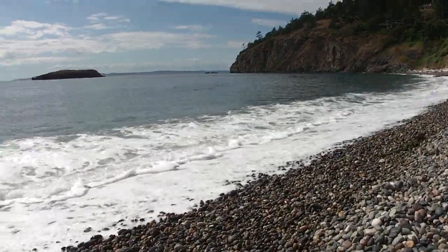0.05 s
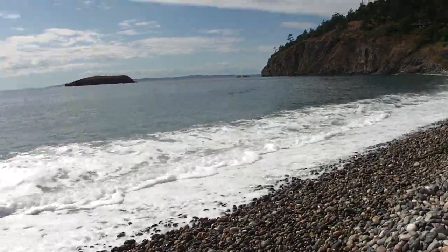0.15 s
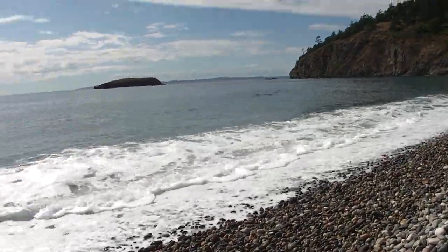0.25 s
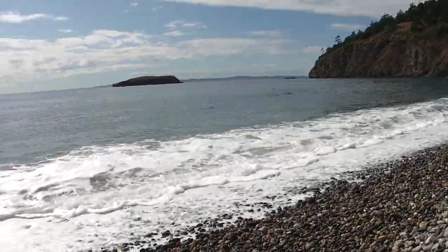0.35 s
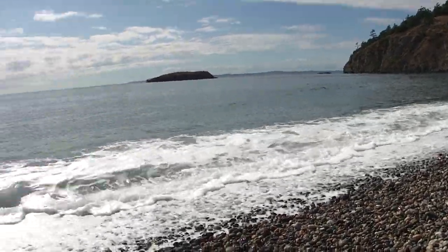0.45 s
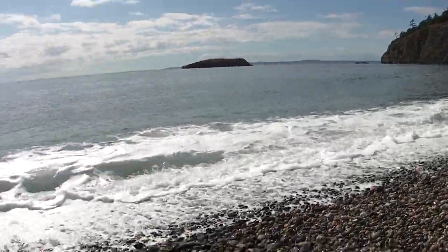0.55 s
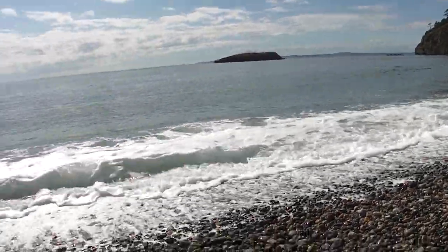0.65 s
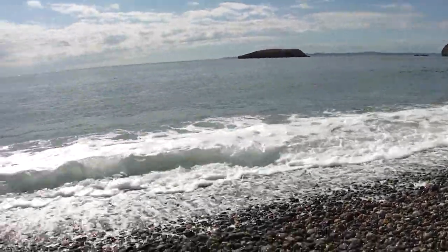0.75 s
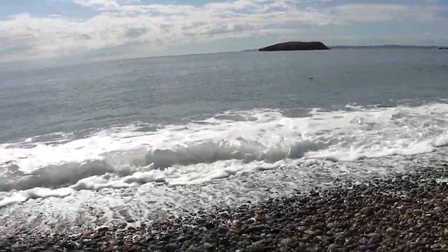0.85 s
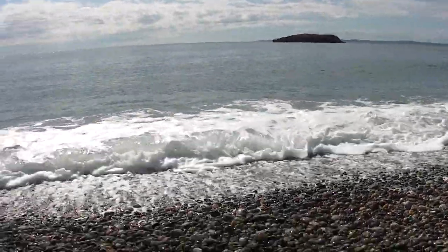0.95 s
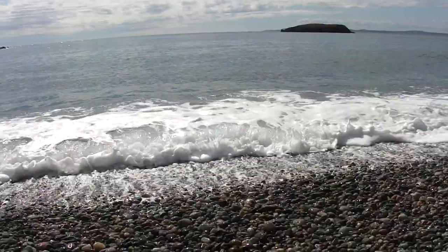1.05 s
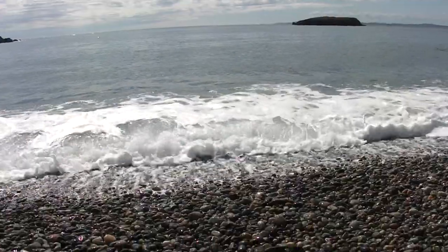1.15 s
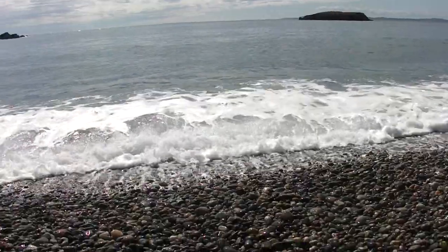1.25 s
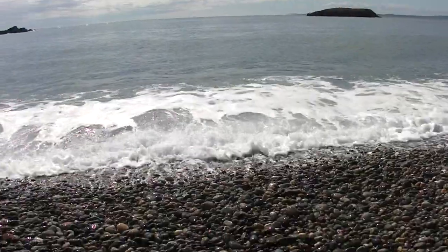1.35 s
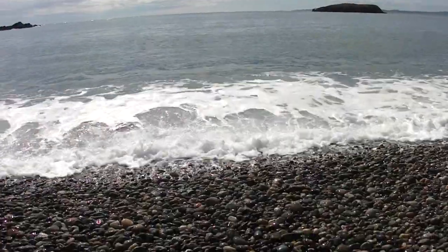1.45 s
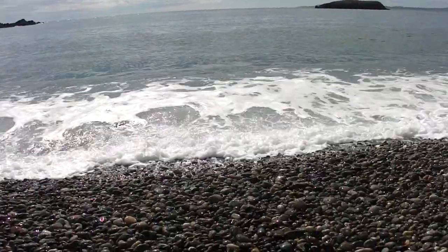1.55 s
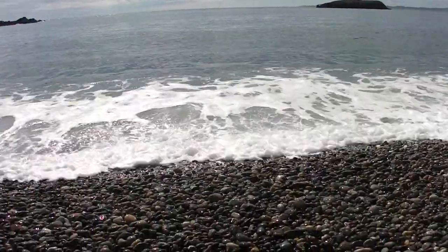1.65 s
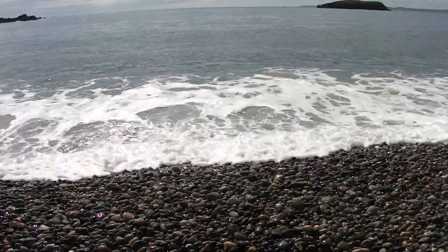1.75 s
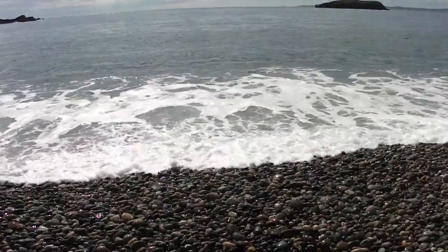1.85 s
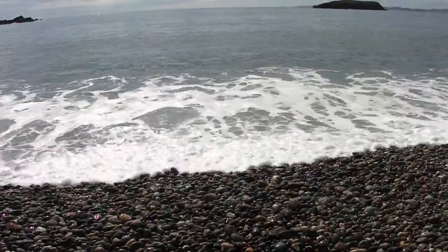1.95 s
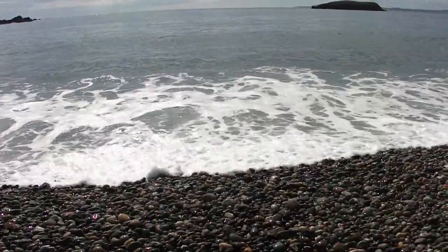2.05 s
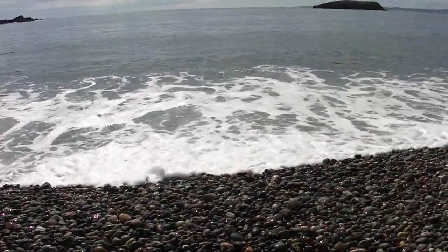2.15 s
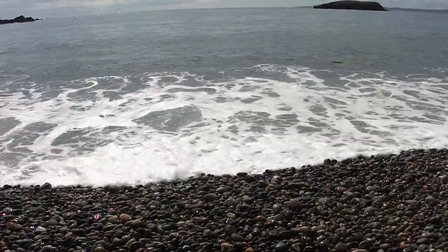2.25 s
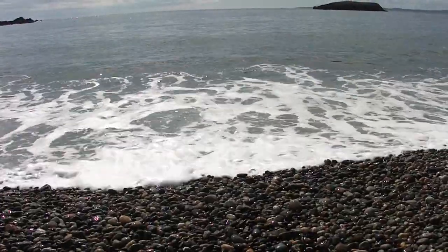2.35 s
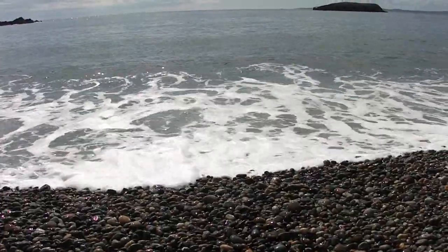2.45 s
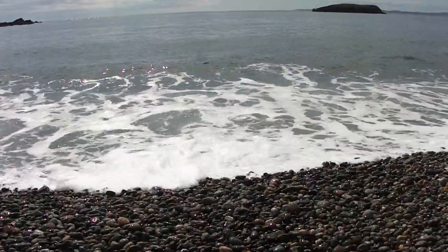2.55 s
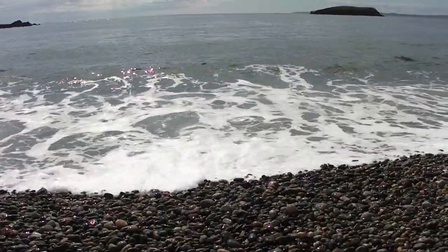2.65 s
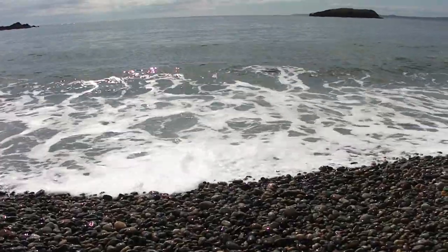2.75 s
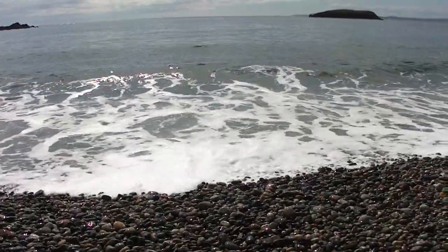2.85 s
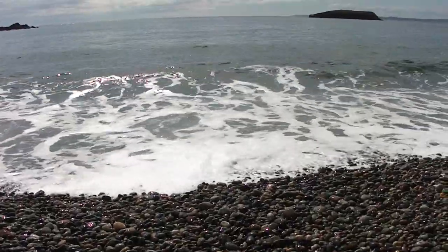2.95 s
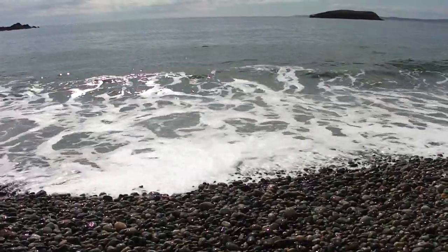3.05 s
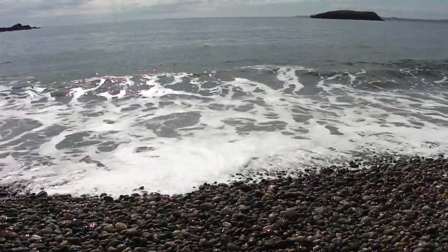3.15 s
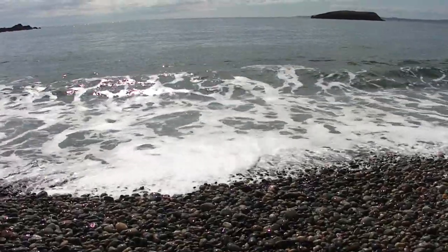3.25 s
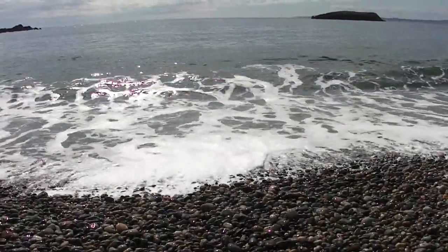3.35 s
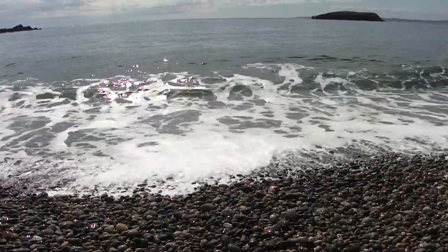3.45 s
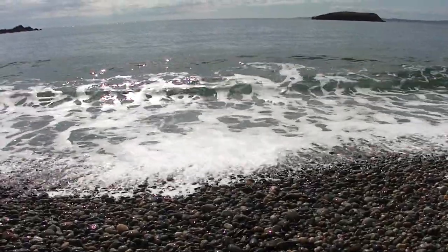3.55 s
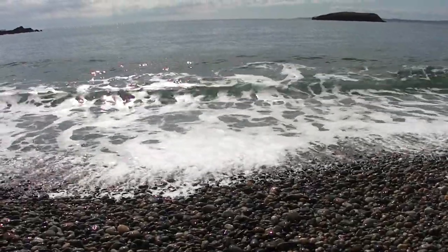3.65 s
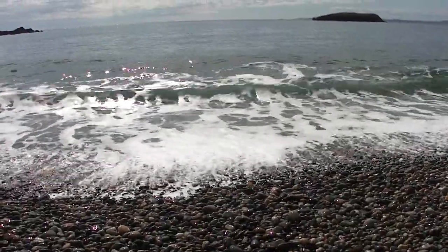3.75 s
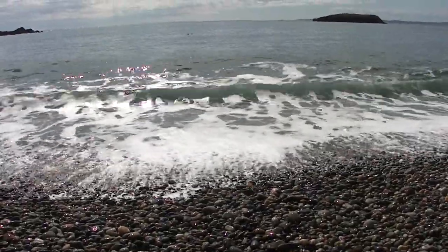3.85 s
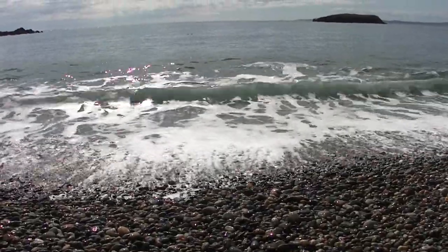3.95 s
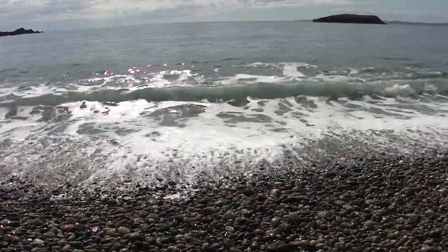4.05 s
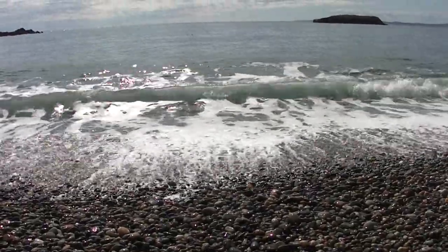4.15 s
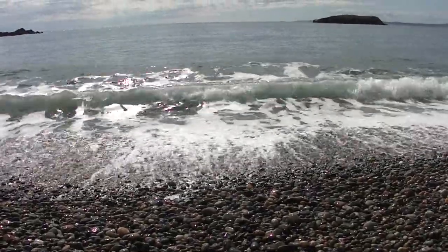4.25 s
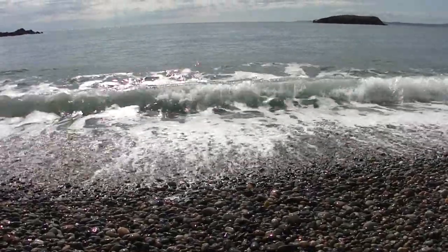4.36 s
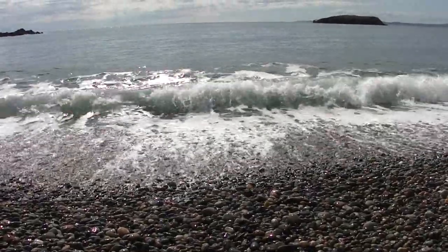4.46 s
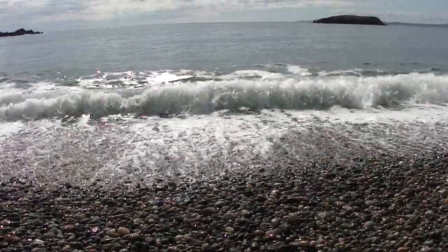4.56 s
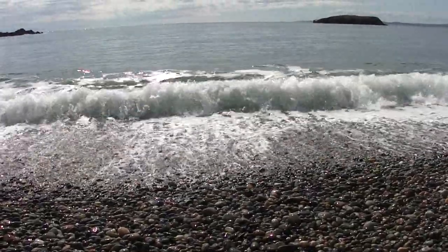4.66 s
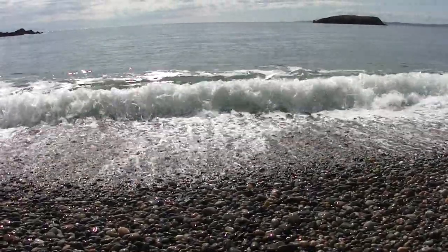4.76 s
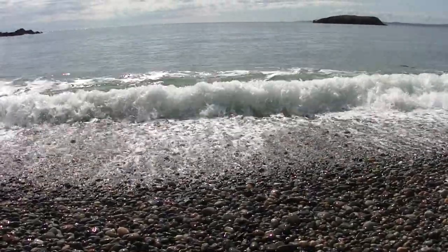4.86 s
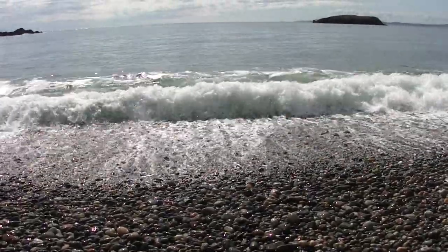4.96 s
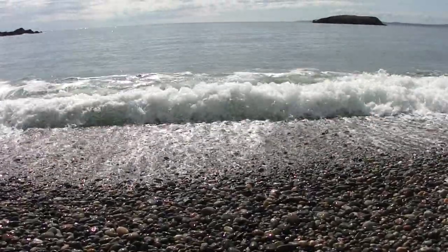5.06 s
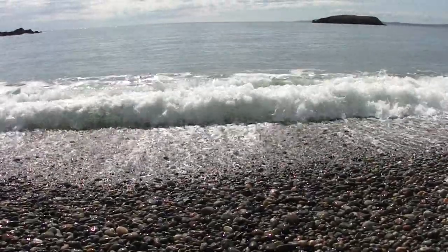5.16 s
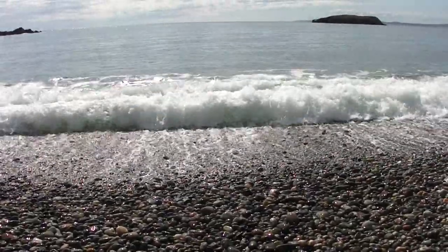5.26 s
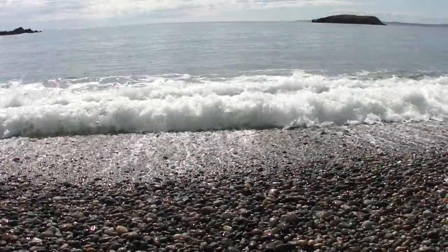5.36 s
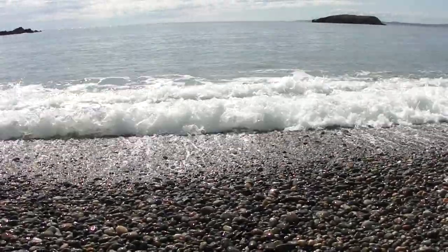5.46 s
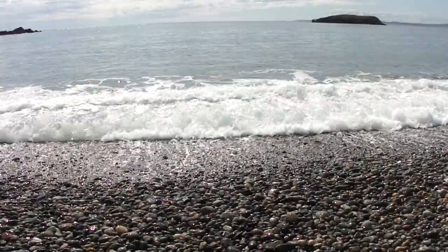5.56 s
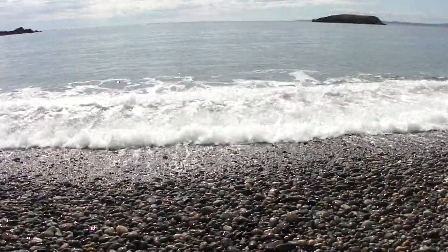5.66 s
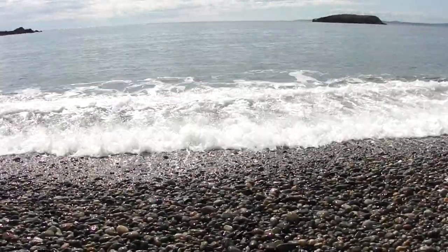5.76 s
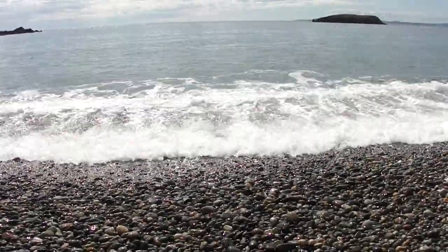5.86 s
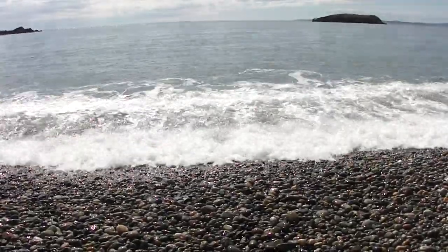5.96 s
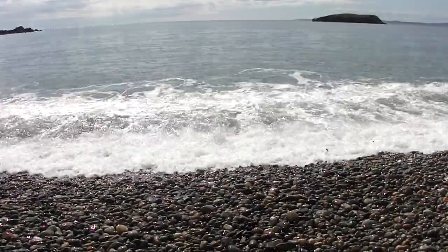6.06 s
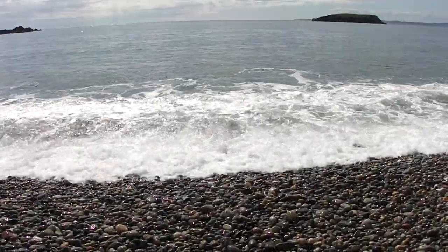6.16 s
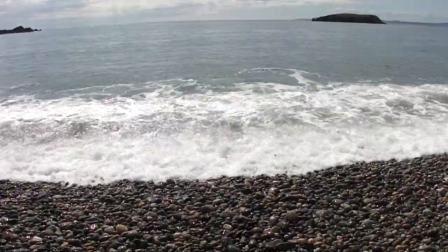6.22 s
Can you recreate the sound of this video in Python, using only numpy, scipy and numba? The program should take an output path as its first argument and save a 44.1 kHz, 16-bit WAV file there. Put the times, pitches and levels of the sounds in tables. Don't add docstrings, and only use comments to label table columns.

```python
import sys
import numpy as np
from scipy import signal
from scipy.io import wavfile
from scipy.ndimage import uniform_filter1d, map_coordinates
from numba import njit

SR = 44100
rng = np.random.default_rng(int(sys.argv[2]) if len(sys.argv) > 2 else 0)


def volts_from_decibels(level):
    exponent = np.asarray(level, float) / 20
    return 10 ** exponent


def master(y):
    cut = np.clip(np.atleast_2d(y).T, -1, 1)
    pcm = np.round(cut * 32767)
    wavfile.write(sys.argv[1], SR, pcm.astype(np.int16))


N = 277389
FRAME, HOP = 1024, 256
TIME = np.arange(N // HOP + 2) * HOP / SR
PITCH = np.maximum(np.arange(FRAME // 2 + 1), .5) * SR / FRAME

# middle_s, peak_db, pitch_hz
LEFT_EDDIES = [(0.048, -6, 226), (0.069, -3, 312), (0.137, -0.5, 280), (0.155, -2, 230), (0.187, -3, 340),
               (0.194, -8, 335), (0.234, -1, 420), (0.312, -2.5, 262), (0.396, -2, 448), (0.411, -2, 390),
               (0.44, -2, 380), (0.468, -6.5, 239), (0.54, -1.5, 270), (0.821, -8, 300), (0.948, -6.5, 280),
               (1.24, -4, 251), (3.775, -10, 292), (3.989, -5.5, 220)]
# middle_s, peak_db, pitch_hz
RIGHT_EDDIES = [(0.66, -2, 320), (0.68, -5, 390), (0.691, -5, 390), (0.742, 1.5, 420), (0.983, -5.5, 250),
                (1.076, -4, 300), (1.151, -2, 300), (1.357, -7, 200), (1.947, -9.5, 298), (2.03, -10, 180),
                (2.695, -18, 170), (2.725, -13.5, 155), (3.336, -7.5, 229), (3.414, -10, 410),
                (3.44, -5.5, 312), (3.468, 0, 290), (3.495, -0.5, 250), (3.509, -0.5, 380), (3.53, -1, 392),
                (3.542, -6, 370), (3.56, -4, 258), (3.578, -1.5, 368), (3.595, -4, 320), (3.602, -4, 520),
                (3.684, -9.5, 250), (3.864, -4, 280), (3.885, -3, 290), (3.907, -4.5, 308),
                (3.954, -6, 197), (4.154, -7, 240)]


def wind(rate_hz=185, calm_hz=135, rise_oct_per_db=0.04, scatter_db=4.5, rumble_db=-3, swirl_db=-5):
    # middle_s, hold_s, level_db
    left_gusts = [(0.25, 0.48, -13.5), (0.7, 0.044, -13.5), (0.87, 0.12, -15.5), (1.0, 0.033, -18),
                  (1.27, 0.22, -18.5), (1.75, .1, -42), (2.0, .03, -42), (3.7, .05, -21),
                  (3.8, 0.024, -11.5), (4.05, 0.13, -24), (4.97, .3, -30), (5.3, .2, -39)]
    # middle_s, hold_s, level_db
    right_gusts = [(0.0, 0.033, -21), (0.3, .03, -18), (0.6, 0.21, -14), (1.1, 0.15, -15.5),
                   (1.4, 0.024, -19), (1.8, 0.24, -38), (2.0, 0.053, -21), (2.2, 0.1, -25),
                   (2.4, 0.24, -43), (2.71, 0.043, -31), (3.05, .02, -38.5), (3.51, 0.21, -11.5),
                   (3.8, 0.32, -18.5), (4.1, .03, -11.5), (4.55, 0.38, -23), (4.8, 0.027, -14.5),
                   (5.05, .1, -38), (5.5, .03, -44), (5.8, .03, -40)]
    port_cross = 0.31

    ports = np.zeros((2, N + SR))
    hits = []  # middle_s, peak, pitch_hz, port
    for port, table in enumerate([LEFT_EDDIES, RIGHT_EDDIES]):
        hits += [(s, volts_from_decibels(db), hz, port) for s, db, hz in table]
    for port, gust_db in enumerate([gusts(left_gusts), gusts(right_gusts)]):
        chance = rng.random((1200, 3))[:int(rate_hz * N / SR)]
        for when, size, quick in chance:
            db = gust_db[int(when * N / HOP)]
            peak = volts_from_decibels(db + swirl_db + scatter_db * min(-np.log(size), 3))
            hz = calm_hz * 2 ** (rise_oct_per_db * (db + 41) + 1.37 * (quick - .5))
            hits.append((when * N / SR, peak, hz, port))
        lowpass = signal.butter(2, 90, fs=SR, output="sos")
        rumble = signal.sosfilt(lowpass, rng.standard_normal(N))
        buffet_db = 0.53 * (gust_db + 38.5) - 36.5 + rumble_db + 4.2 * walk(25)[0]
        buffet = np.interp(np.arange(N) / SR, TIME, volts_from_decibels(buffet_db))
        ports[port, :N] += rumble / rumble.std() * buffet

    for (s, peak, hz, port), skew in zip(hits, rng.uniform(0, 2 * np.pi, size=4000)):
        shape = eddy(hz, skew)
        i = int((s - .0012) * SR) - len(shape) // 2
        ports[port, max(i, 0):i + len(shape)] += peak * shape[max(-i, 0):]
    left, right = ports[:, :N]
    return np.array([left - port_cross * right, right - port_cross * left])


def eddy(hz, skew):
    x = np.arange(-2 * SR // hz, 2 * SR // hz) * hz / SR
    return np.cos(2 * np.pi * x - skew) * np.exp(-np.abs(x / .47) ** 1.2)


def gusts(table, edge_db_s=250, calm_db=-59):
    s, hold_s, db = np.transpose(table)[:, :, None]
    outside_s = np.maximum(np.abs(TIME - s) - hold_s / 2, 0)
    return np.maximum(np.max(db - edge_db_s * outside_s, axis=0), calm_db)


def roar(surge, swell_db=-0.7, flicker_db=1.72, bubbles_db=-6, rate_hz=2500, cycles=3.15, scatter_db=3.0):
    roar_hz = (300, 850, 1250, 1800, 4000)
    # pitch_hz, level_db_per_hz, side_minus_centre_db, left_minus_right_db
    water_colour = [(50, -46, -20, 3), (151, -32.5, -28, 2), (350, -26, -23, 3), (860, -28.5, -19.5, 4.5),
                    (1720, -29, -9.5, 5.5), (2180, -25, -10, 2.5), (3800, -20.5, -7, 3),
                    (5700, -22, -3.5, 2.5), (9000, -44.5, 7, 0), (12000, -75, -4, 1)]
    # start_s, level_db
    wash = [(0.0, -30), (0.35, -31.5), (0.65, -28), (0.75, -34), (1.0, -27), (1.33, -26.5), (1.52, -30.5),
            (1.96, -28), (2.14, -31), (2.63, -40), (3.2, -38), (3.45, -39.5), (3.64, -40), (3.9, -30),
            (4.2, -19.5), (5.5, -21.5), (6.0, -17), (6.29, -16)]
    wash_share_db = (0, -4.5, -11, -52)
    drag_share_db = (3.5, 19, 19, 0)
    far_surf_db = -50.5

    wash_db = curve(wash)[0] + np.c_[wash_share_db].T
    upper = together(wash_db, backwash(roar_hz[1:], drag_share_db))
    levels = np.vstack([together(plunges(), far_surf_db), upper]) + swell_db * surge

    def water_db(hz, frame):
        place = np.interp(np.log(hz), np.log(roar_hz), np.arange(len(roar_hz)))
        return map_coordinates(levels, [place, frame], order=1) + along_hz(hz, water_colour)[0]

    hz, frame = np.meshgrid(PITCH, np.arange(len(TIME)), indexing="ij")
    _, side_db, pan_db = along_hz(hz, water_colour)
    clouds = hiss(water_db(hz, frame) + flicker_db * patches(7), side_db, pan_db)

    chance = rng.random((24000, 4)).T
    chance = chance[:, :int(rate_hz * N / SR)]
    start, hz = (chance[0] * N).astype(np.int64), 250 * 24 ** chance[1]
    _, side_db, pan_db = along_hz(hz, water_colour)
    rare = np.minimum(-np.log(chance[2]), 5)
    bubble_db = water_db(hz, start / HOP) + bubbles_db + scatter_db * rare
    size = volts_from_decibels(bubble_db) * hz * np.sqrt(8 / cycles / rate_hz)
    lean = np.clip(1.5 * volts_from_decibels(side_db), 0, 1) * (2 * chance[3] - 1)
    return clouds + rings(start, hz, cycles + 0 * hz, 0.16, *spread(size, size * lean, pan_db))


def plunges(rise_db_s=62):
    # start_s, level_db, hold_s, decay_db_s
    breakers = [
        (0.0, -43, 0.36, 63),
        (1.198, -31.5, 0.12, 11.5),
        (3.405, -38.5, .02, 60),
        (4.202, -25, 1.56, 17),
    ]
    s, db, hold_s, decay_db_s = np.transpose(breakers)[:, :, None]
    before_s = np.maximum(s - TIME, 0)
    after_s = np.maximum(TIME - s - hold_s, 0)
    return np.max(db - rise_db_s * before_s - decay_db_s * after_s, axis=0)


def backwash(hz, share_db, slip_s=0.01, tilt_hz=4000):
    # start_s, level_db, tilt_db_per_octave
    drag = [(0.0, -54.5, -4.5), (0.33, -50, -1.5), (0.65, -47, -1.5), (0.73, -51, -3.5),
            (1.05, -42.5, -1.5), (1.33, -45.5, 3.5), (1.52, -55, 1), (1.96, -65.5, -1), (2.63, -64, -2),
            (3.05, -55.5, 4.5), (3.4, -49, 3), (3.62, -52, 4), (3.85, -45, 1.5), (4.3, -40, 1.5),
            (4.7, -42.5, -0.5), (5.43, -43.5, -3.5), (5.9, -47, 0), (6.29, -57, 9)]
    # middle_s, db_over_backwash
    slips = [
        (0.1, 4.5),
        (3.24, 5),
        (3.31, 6),
        (3.39, 2.5),
        (2.93, 1),
        (3.85, -1.5),
        (3.92, -4),
        (4.36, 1),
        (5.8, 0.5),
    ]
    s, db = np.transpose(slips)[:, :, None]
    level_db, tilt_db = curve(drag)
    level_db = level_db + np.sum(db * np.exp(-((TIME - s) / slip_s) ** 2), axis=0)
    octaves = np.clip(np.log2(np.c_[hz].T / tilt_hz), -1, 1)
    return level_db + np.c_[share_db].T + tilt_db * octaves


def stones(upper_ratio=1.74, upper_db=-3):
    # start_s, peak_db, ring_hz, t60_s, left_minus_right_db
    knocks = [(1.268, -9.5, 1040, 0.034, 5.0), (1.546, -23, 786, 0.022, 4.5), (1.651, -17, 850, 0.02, 4.0),
              (1.89, -16.5, 830, 0.03, 4.0), (2.182, -23, 1160, 0.018, 4.5), (2.444, -23, 770, 0.038, 4.5),
              (2.531, -15, 750, 0.017, 4.0), (2.793, -16, 1270, 0.016, 4.0), (2.902, -27, 1280, 0.025, 4.5),
              (2.93, -22, 2100, 0.008, 4.0), (2.97, -20.5, 1490, 0.018, 7), (3.171, -24, 1800, 0.025, 2),
              (3.235, -15.5, 1020, 0.033, 6), (3.284, -22, 1430, 0.022, 6), (3.305, -18, 1260, 0.019, 3.5),
              (3.35, -12.5, 1820, 0.014, 7), (3.363, -16, 1740, 0.021, 5.5), (3.391, -11, 1810, 0.015, 5.5),
              (3.401, -17.5, 1260, 0.032, 6), (3.437, -14, 1376, 0.025, 6)]
    s, db, hz, t60_s, pan_db = np.transpose(knocks)
    start = (s * SR).astype(np.int64)
    cycles = np.clip(t60_s, .004, .2) * hz / np.log(1000)
    sides = spread(volts_from_decibels(db), 0, pan_db)
    lower = rings(start, hz, cycles, 0., *sides)
    return lower + rings(start, upper_ratio * hz, cycles, 0., *sides * volts_from_decibels(upper_db))


def foam(surge, swell_db=1.0, flicker_db=-0.56):
    # start_s, level_db, left_minus_right_db
    bursting = [(0.0, -63.5, 4), (0.3, -72, 5), (0.75, -69, 2), (1.05, -59.5, .5), (1.26, -57.5, 0),
                (1.8, -63.5, 1.5), (2.87, -65, 1.5), (3.4, -71, 3), (3.55, -78, 2), (3.8, -66, 6),
                (4.08, -58.5, 1), (4.36, -54, 1), (5.13, -53, 0), (5.66, -52.5, 1.5), (5.8, -49.5, 1.5),
                (5.9, -51, 1), (6.11, -52, 2), (6.29, -57.5, 2)]
    # pitch_hz, level_db_per_hz, side_minus_centre_db
    foam_colour = [(2500, -58, -8), (5200, -30, -8.5), (7160, -33, -4.5), (9560, -30.5, -2.5),
                   (11000, -34, -0.5), (12200, -44, -1), (12800, -62, -1), (14000, -27.5, -1),
                   (16000, -26, -1)]
    fizz_share_db = (15.5, 12)
    spray_share_db = (6.5, -8)

    top_db, pan_db = curve(bursting)
    fizz_db = top_db + np.c_[fizz_share_db].T
    low_db, high_db = together(fizz_db, backwash((7000, 10000), spray_share_db))
    hz = PITCH[:, None]
    colour_db, side_db = along_hz(hz, foam_colour)
    db = low_db + np.clip((hz - 7000) / 2500, 0, 1) * (high_db - low_db)
    db = np.where(hz < 12500, db, top_db) + colour_db
    return hiss(db + swell_db * surge + flicker_db * patches(20), side_db, pan_db)


@njit
def rings(start, hz, cycles, glide, left, right):
    out = np.zeros((2, N))
    for k in range(len(start)):
        w = 2 * np.pi * hz[k] / SR
        p, z = np.exp(1j * w - hz[k] / SR / cycles[k]), 1 + 0j
        turn = np.exp(1j * w * glide * hz[k] / SR / cycles[k])
        for i in range(min(int(5 * cycles[k] * SR / hz[k]), N - start[k])):
            z, p = z * p, p * turn
            v = z.imag * min(1., 2 * i * hz[k] / SR)
            out[0, start[k] + i] += left[k] * v
            out[1, start[k] + i] += right[k] * v
    return out


def hiss(db, side_db, pan_db):
    noise = rng.standard_normal((2, (len(TIME) - 1) * HOP)) * np.sqrt(SR / 2)
    centre, side = signal.stft(noise, nperseg=FRAME, noverlap=FRAME - HOP)[2] * volts_from_decibels(db)
    sides = spread(centre, side * volts_from_decibels(side_db), pan_db)
    return signal.istft(sides, nperseg=FRAME, noverlap=FRAME - HOP)[1][:, :N]


def spread(centre, side, pan_db):
    return np.array([(centre + side) * volts_from_decibels(pan_db / 2), (centre - side) * volts_from_decibels(-pan_db / 2)])


def patches(rate_hz):
    walks = 1.4 * uniform_filter1d(walk(rate_hz, count=22), size=2, axis=0)
    place, frame = np.meshgrid(2 * np.log2(PITCH / 20), np.arange(len(TIME)), indexing="ij")
    return map_coordinates(walks, [place, frame], order=1)


def walk(rate_hz, count=1):
    k = max(int(SR / HOP / rate_hz), 1)
    held = np.repeat(rng.standard_normal((count, len(TIME))), k, axis=1)[:, :len(TIME)]
    return uniform_filter1d(uniform_filter1d(held, k, axis=1), k, axis=1)


def curve(table):
    s, *columns = np.transpose(table)
    return [np.interp(TIME, s, c) for c in columns]


def along_hz(hz, table):
    f, *columns = np.transpose(table)
    return [np.interp(np.log(hz), np.log(f), c) for c in columns]


def together(a_db, b_db):
    return 10 * np.log10(volts_from_decibels(2 * a_db) + volts_from_decibels(2 * b_db))


def scene():
    surge = walk(10)
    return wind() + roar(surge) + stones() + foam(surge)


def roll_off(x):
    return signal.sosfilt(signal.butter(12, 17110, fs=SR, output="sos"), x)


def record(dry):
    # pitch_hz, width_hz
    notches = [(3000, 2050), (4000, 1410), (5000, 1980), (12000, 4630), (13400, 5060)]
    bass_cut_hz, top_hz, hiss_db, tick_db = 140, 15690, -84, -26

    x = signal.sosfilt(signal.butter(3, bass_cut_hz, "high", fs=SR, output="sos"), dry)
    for hz, width_hz in notches:
        x = signal.lfilter(*signal.iirnotch(hz, hz / width_hz, SR), x)
    x = x + volts_from_decibels(hiss_db) * rng.standard_normal(x.shape)
    for port, table in enumerate([LEFT_EDDIES, RIGHT_EDDIES]):
        for s, db, _ in table:
            x[port, int(s * SR)] += volts_from_decibels(2 * db + tick_db)
    x = signal.sosfilt(signal.ellip(12, .3, 80, top_hz, fs=SR, output="sos"), x)
    return roll_off(x)


dry = scene()
out = record(dry)
master(out)
```